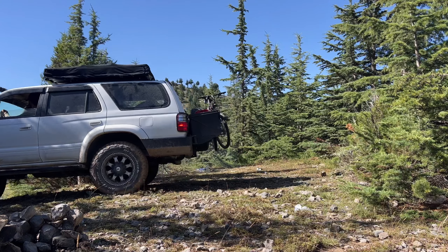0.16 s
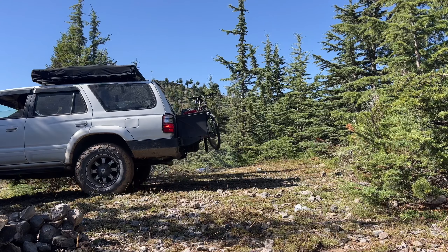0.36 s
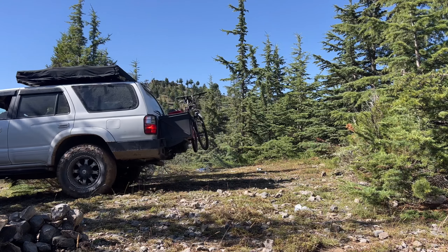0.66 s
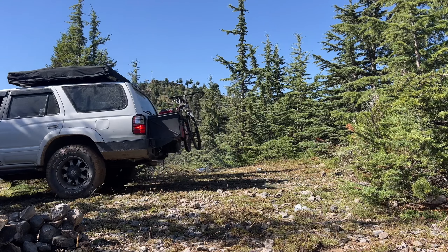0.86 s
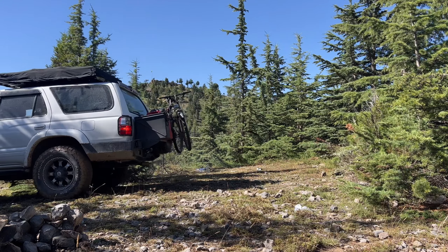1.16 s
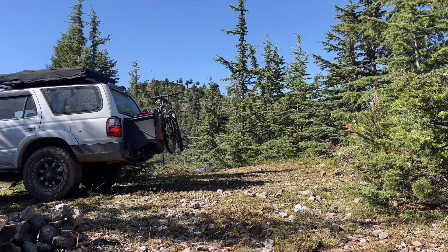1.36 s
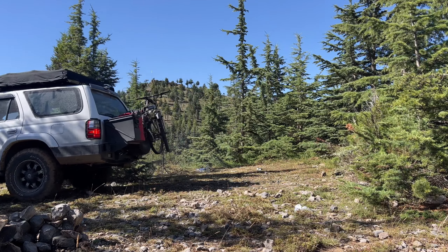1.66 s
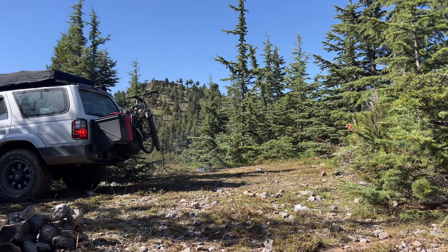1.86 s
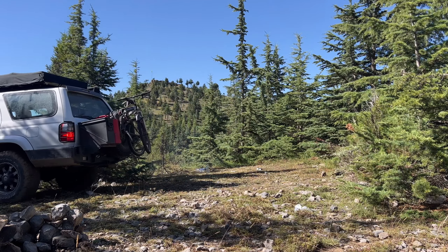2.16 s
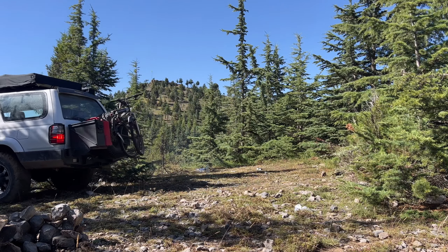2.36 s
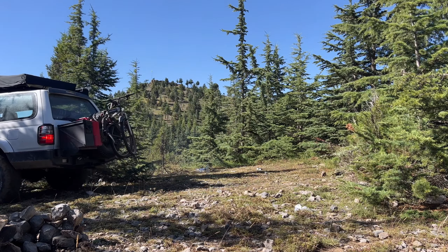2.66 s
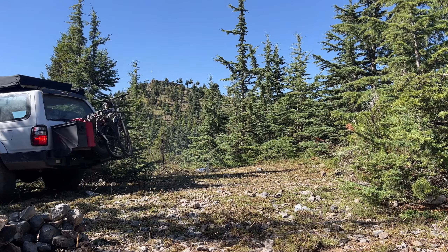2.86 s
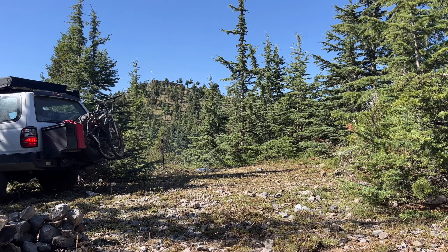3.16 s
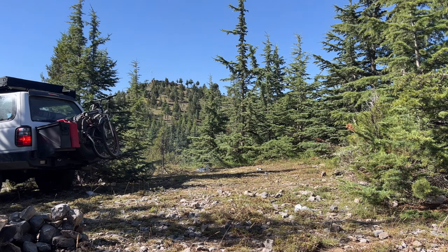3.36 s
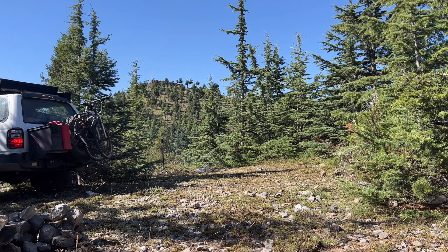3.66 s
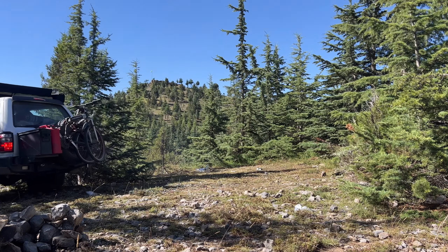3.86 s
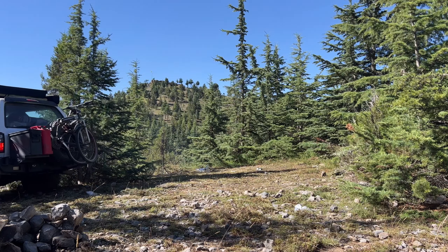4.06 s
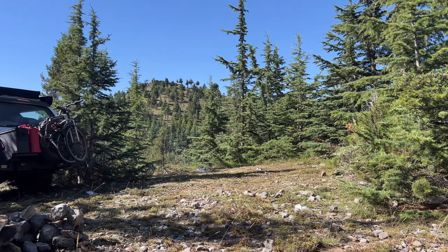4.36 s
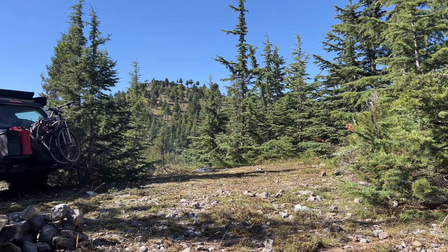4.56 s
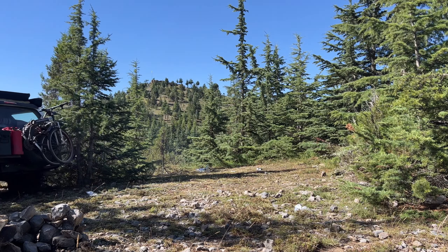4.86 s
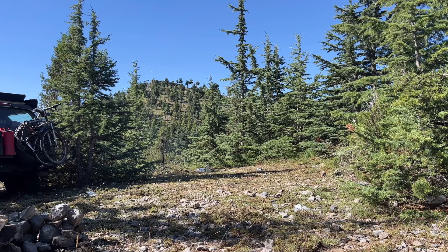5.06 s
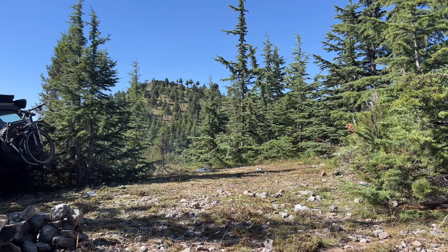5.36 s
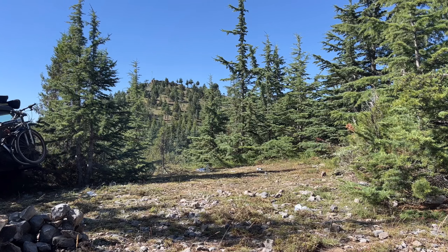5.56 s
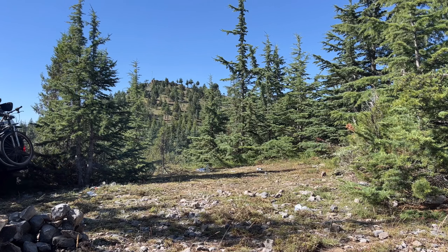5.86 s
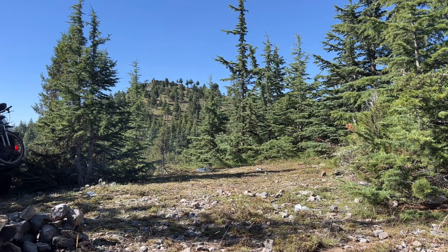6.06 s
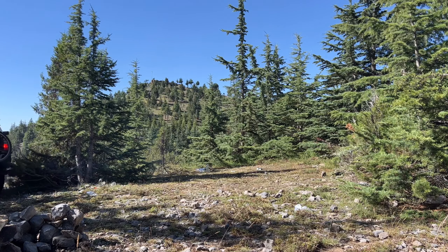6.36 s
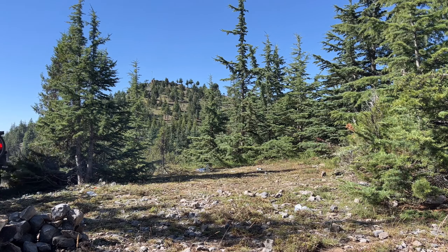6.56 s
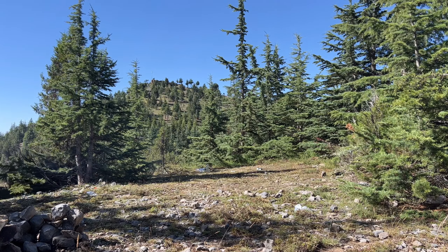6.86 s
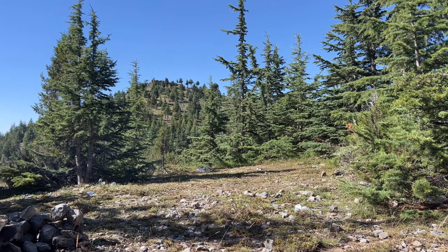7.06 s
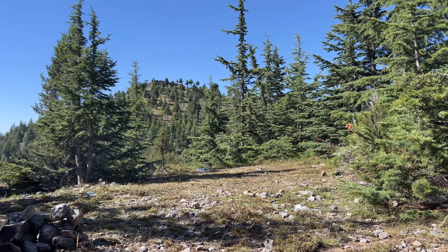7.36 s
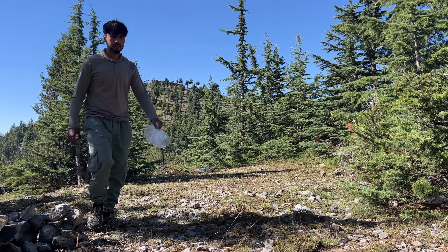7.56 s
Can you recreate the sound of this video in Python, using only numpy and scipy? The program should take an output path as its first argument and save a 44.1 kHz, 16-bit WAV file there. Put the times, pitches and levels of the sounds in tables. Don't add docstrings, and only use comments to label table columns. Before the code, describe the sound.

Loud low engine idle with a throbbing exhaust, crisp small-bird chirps throughout, scattered stone knocks and faint brake squeals in open woodland.

```python
import sys
import numpy as np
from scipy import signal
from scipy.fft import rfft, irfft, next_fast_len
from scipy.io import wavfile
from scipy.ndimage import uniform_filter1d

SR = 44100
rng = np.random.default_rng(int(sys.argv[2]) if len(sys.argv) > 2 else 0)


def bounce(signal):
    frames = np.transpose(np.atleast_2d(signal))
    limited = np.clip(frames, -1, 1)
    pcm = np.round(limited * 32767).astype(np.int16)
    wavfile.write(sys.argv[1], SR, pcm)


def undo_db(level):
    steps = np.asarray(level, float) / 20
    return 10 ** steps


N = 339518

# frequency in Hz, density in dB per Hz.
WASH_SPECTRUM = [(25, -38), (70, 2.5), (220, -1), (330, -7.5), (1500, -16.5), (2400, -23), (5500, -26),
                 (16000, -51.5)]
# frequency in Hz, correlation from 0 to 1.
WASH_LIKENESS = [(100, 1), (250, 0.92), (500, 0.18), (1000, 0.024), (8000, 0.053), (15000, .3)]
# frequency in Hz, left minus right in dB.
WASH_LEAN = [(60, -4.5), (150, -2.5), (380, 3), (950, 1), (2400, 1), (6030, 0.0)]

# time in seconds, frequency in Hz, level in dB.
ARCH_SHAPE = [(0, 4600, -14), (.006, 5500, -7), (.011, 6050, -1), (.018, 5800, -7), (.026, 5900, 0),
              (.032, 4900, -14), (.044, 4700, -24), (.05, 4850, -11), (.06, 4600, -24)]
# time in seconds, frequency in Hz, level in dB.
HOOK_SHAPE = [(0, 5600, -26), (.006, 6200, -14), (.012, 6200, -18), (.018, 5700, -24), (.024, 5900, 0),
              (.036, 5850, -2), (.044, 5700, -22), (.088, 4950, -24), (.098, 5000, -10)]
# time in seconds, frequency in Hz, level in dB.
PAIR_SHAPE = [(0, 3900, -13), (.008, 4350, -4), (.013, 4050, -6), (.016, 4050, -14), (.02, 4100, 3),
              (.028, 4000, -3), (.033, 3500, -24), (.042, 3000, -9), (.054, 2650, -22)]
# time in seconds, frequency in Hz, level in dB.
WARBLE_SHAPE = [(0, 3500, -8), (.008, 4400, -3), (.014, 3400, -2), (.02, 3900, 0), (.03, 2900, -3),
                (.04, 2850, -6), (.05, 2400, -14), (.058, 2300, -28)]
# start in seconds, level in dB, loudest frequency in Hz, left minus right in dB.
ARCH_CALLS = [
    (0.173, -43, 5785, 0.5),
    (0.855, -52.5, 5920, -7),
    (2.163, -49, 5810, 20.5),
    (3.525, -45.5, 5890, -2),
    (4.869, -48, 5790, 6),
    (5.751, -49.5, 5790, 1),
    (6.885, -47, 5920, -6),
]
# start in seconds, level in dB, loudest frequency in Hz, left minus right in dB.
HOOK_CALLS = [
    (0.797, -50.5, 6000, 2.5),
    (0.964, -58.5, 5930, 1),
    (2.183, -44, 5720, 6),
    (3.687, -47.5, 5640, 1),
    (5.269, -45, 5900, 1),
    (6.392, -48.5, 5990, 17),
]
# start in seconds, level in dB, loudest frequency in Hz, left minus right in dB.
PAIR_CALLS = [(0.34, -48, 4140, -6.5), (0.98, -46, 4120, -2), (1.714, -47, 4095, -3.5),
              (2.503, -48, 3950, -2.5), (3.048, -50, 4120, 2.5), (3.728, -46, 4096, -1.5),
              (4.384, -47, 4037, 5), (5.002, -45, 4080, -4), (5.808, -45.5, 4260, -2.5),
              (6.421, -48.5, 4000, 5), (6.825, -52, 4080, -5), (7.424, -48, 3967, 19)]
# start in seconds, level in dB, loudest frequency in Hz, left minus right in dB.
WARBLE_CALLS = [(0.071, -59.5, 3940, 2), (0.648, -62, 3720, 8), (0.723, -55, 3980, 1),
                (1.245, -63, 4450, 16), (1.937, -59.5, 4540, 15.5), (2.11, -47, 3856, 2),
                (2.835, -59, 3980, 2), (3.303, -65, 4020, -20), (3.609, -49, 3990, -1),
                (4.043, -65, 3770, -5), (4.1, -67, 3730, -14), (4.241, -61, 3850, 2),
                (5.2, -46.5, 3975, -7), (6.22, -68, 4320, 22), (6.317, -50, 4050, 0),
                (7.592, -69, 3570, -6)]
# start and end in seconds, first and settled frequency in Hz, level in dB.
BIRD_WHISTLES = [(4.575, 4.87, 2900, 3450, -52), (4.16, 4.29, 7500, 7700, -63),
                 (2.89, 2.97, 3650, 3700, -55), (2.54, 2.6, 3650, 3700, -53), (6.67, 6.72, 3400, 3380, -54),
                 (6.74, 6.79, 3450, 2900, -55), (7.33, 7.47, 7150, 7550, -69), (2.67, 2.7, 5450, 5450, -58),
                 (5.58, 5.62, 3700, 4150, -56), (.92, .945, 4050, 4100, -53),
                 (5.19, 5.205, 5700, 5950, -55), (7.49, 7.52, 5500, 5600, -58),
                 (1.925, 1.96, 4900, 4800, -54), (.66, .68, 4800, 4750, -57), (6.86, 6.9, 3300, 4000, -55),
                 (4.3, 4.36, 4000, 3950, -57)]
# start and end in seconds, first and settled frequency in Hz, level in dB.
BRAKE_SONGS = [
    (.03, .28, 1650, 1790, -59),
    (1.5, 1.85, 2550, 2500, -64),
    (1.8, 2.2, 1200, 1180, -62),
    (2.26, 3.15, 2060, 2040, -54.5),
    (4.55, 5.05, 1270, 1230, -61),
    (6.78, 6.95, 2300, 2330, -62),
]

# start in seconds, peak level in dB, frequency in Hz, left minus right in dB.
STONE_KNOCKS = [
    (0.161, -37, 440, -14),
    (0.296, -38, 450, -1),
    (0.415, -32, 640, 1.5),
    (.795, -34, 582, -3.5),
    (1.548, -35.5, 380, 2.5),
    (3.07, -40, 610, 6),
    (3.685, -34.5, 445, -2),
    (3.752, -23.5, 373, 2.5),
    (4.155, -33, 626, 8),
    (5.891, -37, 560.8, 7.5),
]
# start in seconds, peak level in dB, frequency in Hz, rise time in seconds.
TWIG_SNAPS = [
    (1.501, -48, 6000, 0.0011),
    (1.5, -51, 2630, 0.0014),
    (4.715, -58, 6900, .001),
    (6.055, -57.5, 7340, 0.017),
    (6.069, -66.5, 12500, .012),
    (6.238, -55, 3050, .001),
    (7.652, -54, 7950, 0.0015),
]

# time in seconds, rate in Hz.
CYCLE_RATE = [(0, 22.68), (.73, 22.49), (1.31, 21.32), (1.54, 21.54), (2.36, 21.4), (2.59, 21.86),
              (3.0, 21.5), (4.29, 21.68), (4.97, 21.22), (5.25, 22.77), (5.43, 22.08), (6.04, 22.65),
              (6.4, 22.0), (6.81, 22.54), (6.95, 21.98), (7.7, 21.25)]
# multiple of the cycle rate, level in dB.
EXHAUST_ORDERS = [(2, -15), (3, -11), (4, 0), (5, -2.5), (6, -11), (7, -17.5), (8, -14), (9, -12.5),
                  (10, -19.5), (11, -20), (12, -38), (13, -36)]
# time in seconds, main order in dB, tailpipe aim at the microphone from 0 to 1.
CAR_TURN = [(0, -23.5, 0), (1.4, -25, 0.88), (3, -24.5, 0.91), (4.7, -24.5, 0.64), (5.4, -24.5, 0.29),
            (6.2, -26, 0.05), (7.7, -27, 0.54)]
# time in seconds, gain in dB.
BASS_GAIN = [
    (7.47, -1),
    (7.5, -6),
    (7.527, -10),
    (7.54, -36),
    (7.6, -32),
    (7.64, -14.5),
    (7.68, -7.5),
]


def evened(x):
    return x / np.sqrt(np.mean(x ** 2) + 1e-20)


def read(points, hz):
    f, value = np.transpose(points)
    return np.interp(np.log(hz + 1), np.log(f + 1), value)


def curve(rows):
    s, *columns = np.transpose(rows)
    return [np.interp(np.arange(N) / SR, s, column) for column in columns]


def drift(span_s, length):
    size = int(span_s * SR) + 1
    points = rng.standard_normal(length // size + 2)
    joined = np.interp(np.arange(length) / size, np.arange(len(points)), points)
    return 1.3 * uniform_filter1d(joined, size)


def add(mix, s, sound, pan_db):
    part = mix[:, round(s * SR):][:, :len(sound)]
    part += undo_db(np.array([[pan_db], [-pan_db]]) / 2) * sound[:part.shape[1]]


def wash():
    near_db, leave_s, level_db = 4, 2.2, -42
    frames, hz = N // 256 + 5, np.fft.rfftfreq(1024, 1 / SR)
    a, b, c, d, patches = rng.standard_normal((frames, 513, 5)).T
    patches = uniform_filter1d(patches, size=8, axis=0)
    patches = evened(uniform_filter1d(patches, size=14, axis=1))
    same = np.clip(read(WASH_LIKENESS, hz), -1, 1)[:, None]
    left, other = a + 1j * b, c + 1j * d
    right = same * left + np.sqrt(1 - same ** 2) * other
    lean = undo_db(read(WASH_LEAN, hz)[:, None] / 2)
    spectra = np.array([left * lean, right / lean])
    leaving_db = near_db * np.exp(-np.arange(frames) * 256 / SR / leave_s)
    car_share = 1 / (1 + (hz / 1200) ** 2)
    spectra *= undo_db(read(WASH_SPECTRUM, hz)[:, None] + 1.1 * patches + car_share[:, None] * leaving_db)
    noise = signal.istft(spectra, nperseg=1024, noverlap=768)[1][:, :N]
    return undo_db(level_db) * evened(noise)


def chip(shape, pitch, flutter_db, wobble):
    s, hz, db = np.transpose(shape)
    t = np.arange(round(s[-1] * SR)) / SR
    glide = uniform_filter1d(np.interp(t, s, hz), size=60) * pitch
    glide *= 1 + wobble * drift(0.0022, len(t))
    loud = undo_db(np.interp(t, s, db) + flutter_db * drift(0.00407, len(t)))
    loud *= signal.windows.tukey(len(t), .1)
    return loud * np.sin(2 * np.pi * np.cumsum(glide) / SR)


def far_flock():
    out = np.zeros((2, N))
    kinds = (ARCH_SHAPE, WARBLE_SHAPE, PAIR_SHAPE, WARBLE_SHAPE)
    for at, kind, pitch, size in rng.random((70, 4)):
        call = chip(kinds[int(4 * kind)], .85 + .2 * pitch, 4, .08)
        add(out, at * (N / SR - .1), undo_db(-56.5 + 6 * size) * call, 0)
    return out


def wood(x, t60):
    size = next_fast_len(SR // 2 + N)
    t, turn = np.arange(SR // 2) / SR, np.arange(N) / SR * 2.3
    out = 0
    for k in range(3):
        taps = rng.standard_normal((2, len(t))) * (rng.random((2, len(t))) < .012)
        taps *= undo_db(4 * rng.standard_normal(taps.shape))
        taps *= undo_db(-60 * t / t60) * (1 - np.exp(-t / 0.031))
        window = np.sqrt(2 / 3) * np.cos(turn + k * np.pi / 3)
        heard = rfft(x.mean(0) * window, size)
        out = out + heard * rfft(taps / np.linalg.norm(taps[0]), size)
    return irfft(out, size)[:, :N]


def branches(x):
    taps = rng.standard_normal((2, 600)) * (rng.random((2, 600)) < .015)
    taps *= undo_db(-11 - np.arange(600) / 80)
    taps[:, 0] = 1
    return signal.oaconvolve(x, taps / np.linalg.norm(taps, axis=1)[:, None], axes=1)[:, :N]


def whistles():
    sag = .04
    out = np.zeros((2, N))
    for start, end, first_hz, settled_hz, db in BIRD_WHISTLES + BRAKE_SONGS:
        n = round(np.clip(end - start, .01, 1) * SR)
        along = np.arange(n) / n
        glide = settled_hz * (1 - sag * along)
        glide += (first_hz - settled_hz) * np.exp(-along / .18)
        glide += 45 * drift(0.006, n)
        swell = np.sin(np.pi * along ** 0.71)
        for side in out:
            part = side[round(start * SR):][:n]
            flicker = undo_db(db + 5 * drift(.007, n))
            part += flicker * swell * np.sin(2 * np.pi * (np.cumsum(glide) / SR + rng.random()))
    return out


def stones():
    out, t = np.zeros((2, N)), np.arange(4000) / SR
    for s, db, hz, pan_db in STONE_KNOCKS:
        ring = np.sin(2 * np.pi * hz * t) + 0.38 * np.sin(2 * np.pi * 0.86 * hz * t)
        add(out, s, undo_db(db + 1.5 - 60 * t / 0.02) * ring, pan_db)
    return out


def twigs():
    out, t = np.zeros((2, N)), np.arange(4000) / SR
    for s, db, hz, rise in TWIG_SNAPS:
        band = signal.butter(3, [hz * .72, hz * 1.3], "band", fs=SR)
        crack = evened(signal.lfilter(*band, rng.standard_normal(len(t))))
        swell = t / rise * np.exp(1 - t / rise) ** .8
        add(out, s, undo_db(db) * swell * crack, 2 * rng.standard_normal())
    return out


def finches():
    straight, sideways = np.zeros((2, N)), np.zeros((2, N))
    flock = ((ARCH_SHAPE, ARCH_CALLS), (HOOK_SHAPE, HOOK_CALLS),
             (PAIR_SHAPE, PAIR_CALLS), (WARBLE_SHAPE, WARBLE_CALLS))
    for shape, calls in flock:
        loudest_hz = max(shape, key=lambda row: row[2])[1]
        flatter = np.multiply(shape, [1, .97, .4])
        for start, level_db, hz, pan_db in calls:
            gain, pitch = undo_db(level_db + 7), hz / loudest_hz
            add(straight, start, gain * chip(shape, pitch, 2.5, .02), pan_db)
            add(sideways, start, gain * chip(flatter, pitch, 4, .06), 0)
    return straight, sideways


def uneven_puffs(turn):
    uneven = (1, -1, 0)
    order, at, width_turns = 5.2, .535, .14
    turns = turn / (2 * np.pi)
    since = turns % 1 - at
    burst = np.exp(-((since + .05) / width_turns) ** 2 / 2) * np.cos(2 * np.pi * order * since)
    return -np.take(uneven, np.floor(turns).astype(int) % len(uneven)) * burst


def exhaust():
    start_turn, start_rad, puff_db = -.368, -2.88, -7.5
    late, late_rad = (2, 3, 6, 8, 10, 12), 1.7
    turn = 2 * np.pi * (np.cumsum(curve(CYCLE_RATE)[0]) / SR + start_turn)
    main_db, aim = curve(CAR_TURN)
    out = undo_db(main_db + puff_db) * uneven_puffs(turn) * np.ones((2, 1))
    for k, db in EXHAUST_ORDERS:
        swing_db = {2: -6, 5: 3.5}.get(k, 8.5 if k > 7 else 0)
        waver = undo_db(.09 * k * drift(.06, N))
        rad = k * turn + start_rad - late_rad * (k in late) + .018 * k * drift(.1, N)
        ports = np.cos(rad + [[0.021 * k], [-.012 * k]])
        out += undo_db(main_db + db + swing_db * (aim - 1)) * waver * ports
    return np.sqrt(2) * undo_db([[.3], [-.3]]) * out


def scene():
    straight, sideways = finches()
    small = whistles() + stones() + twigs()
    echoes = wood(undo_db(-3.5) * sideways + far_flock() + undo_db(-5.0) * small, t60=0.63)
    return exhaust() + wash() + branches(straight) + small + echoes


def top_cut(x):
    return signal.sosfilt(signal.butter(12, 15750, fs=SR, output="sos"), x)


def record(dry):
    bass = signal.sosfiltfilt(signal.butter(4, 290, fs=SR, output="sos"), dry)
    filtered = dry - bass * (1 - undo_db(curve(BASS_GAIN)[0]))
    return top_cut(filtered)


dry = scene()
out = record(dry)
bounce(out)
```